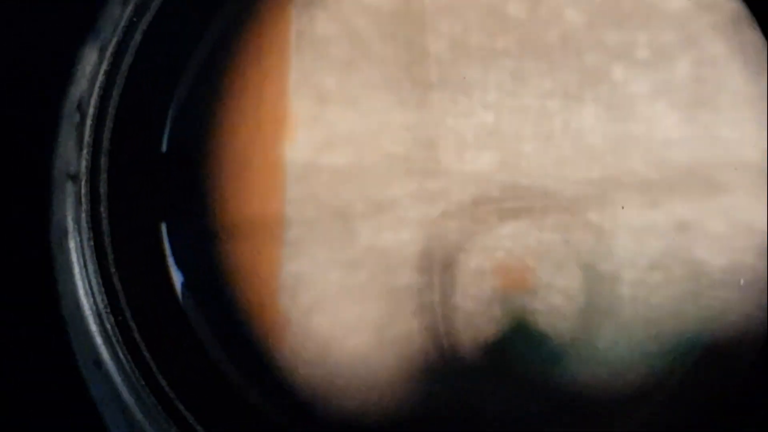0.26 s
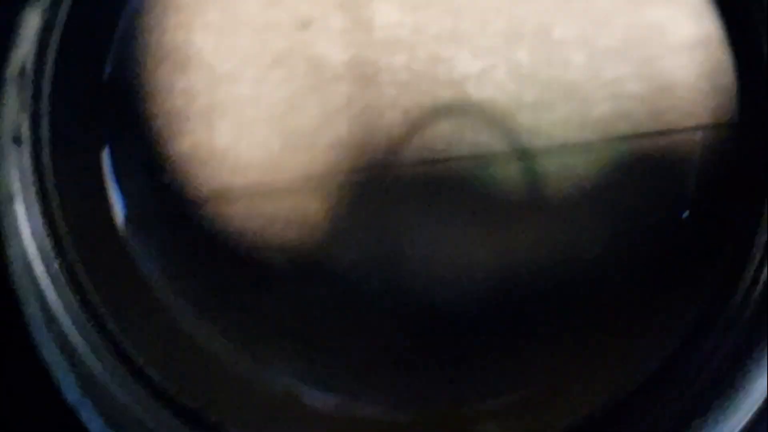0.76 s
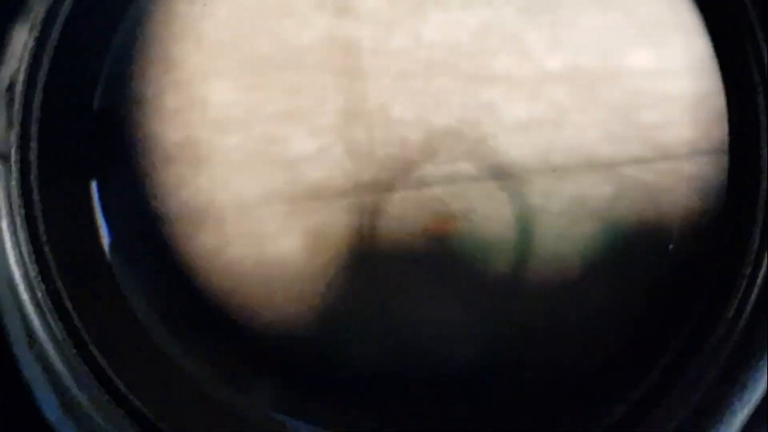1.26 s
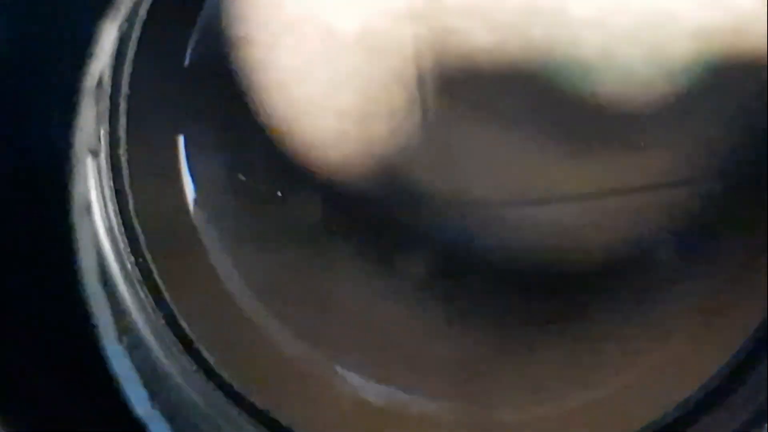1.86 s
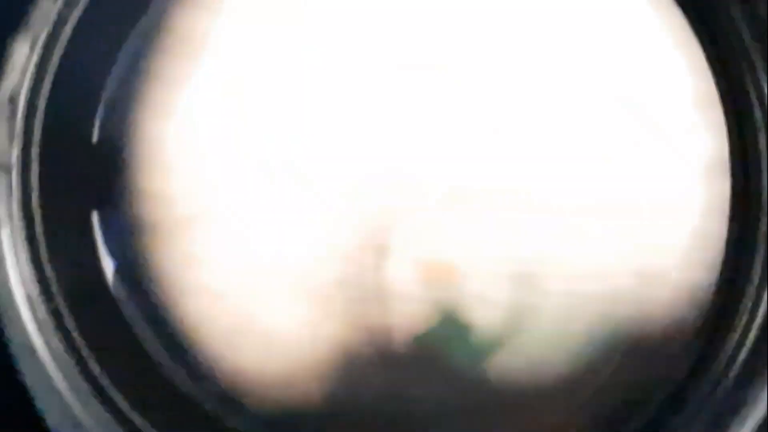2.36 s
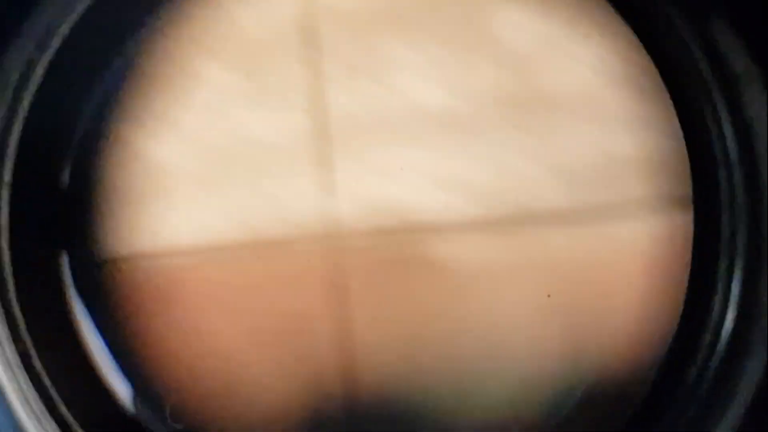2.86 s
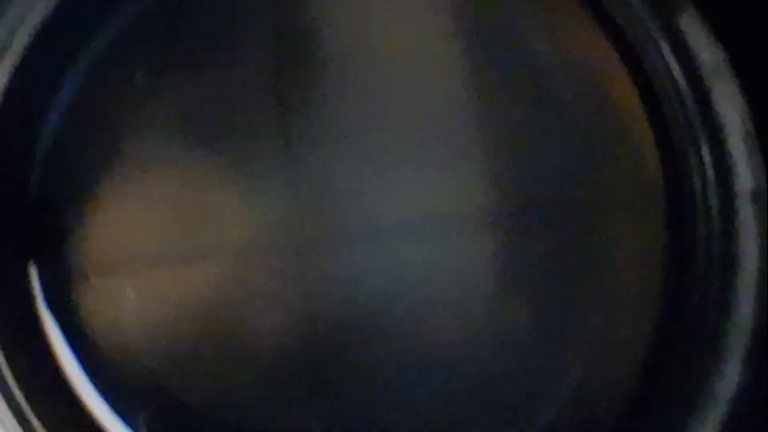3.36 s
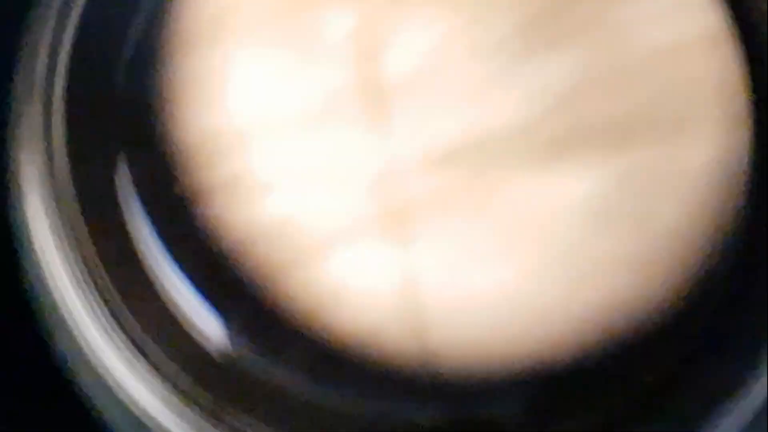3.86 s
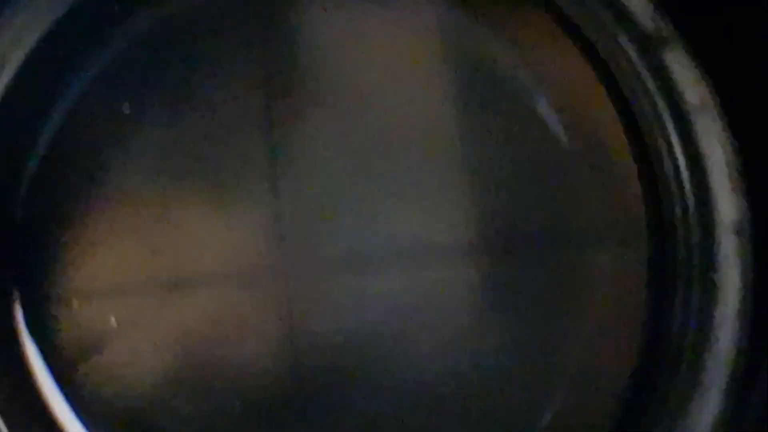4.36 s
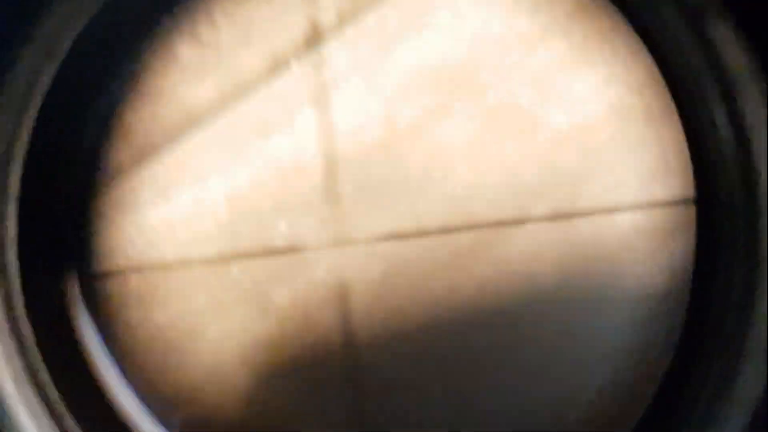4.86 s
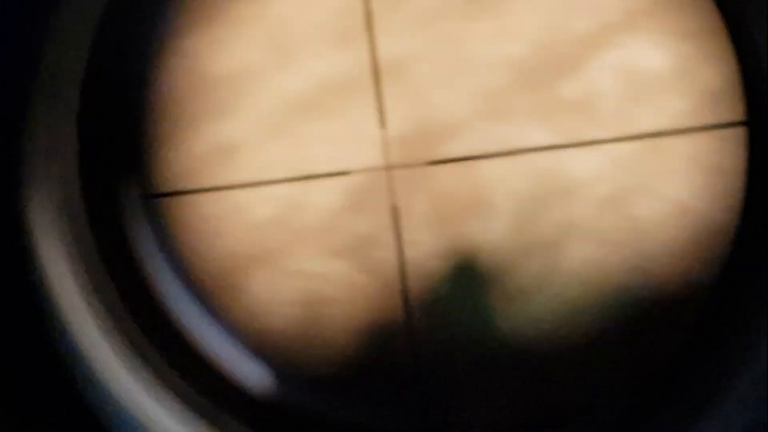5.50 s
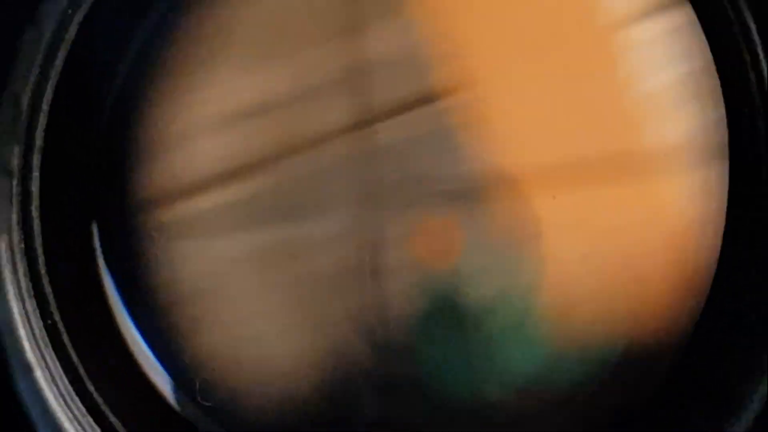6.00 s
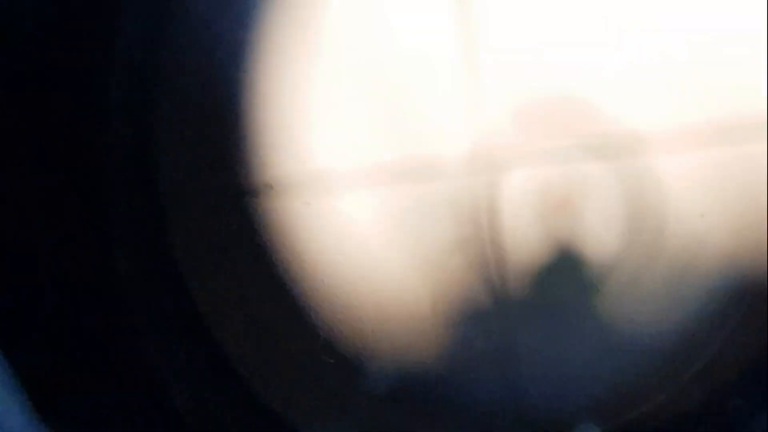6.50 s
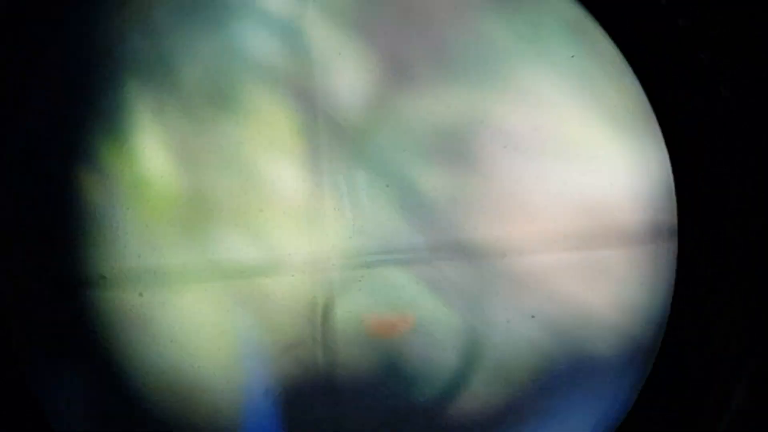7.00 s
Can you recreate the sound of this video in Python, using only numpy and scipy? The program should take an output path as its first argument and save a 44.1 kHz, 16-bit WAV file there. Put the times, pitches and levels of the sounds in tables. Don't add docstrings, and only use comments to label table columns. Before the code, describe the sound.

Very close on an air rifle under an outdoor shelter. Soft rumbles, cloth rustle and muffled wood bumps come first; then a loud lever clunk, a scraping, groaning cocking stroke, bright steel clicks, a latch snap and a return scrape. After a brief lull it is set down with a double clacking knock, a loose fitting rattles, and faint bird cheeps sit in quiet air hiss. The microphone is mounted on the rifle, picking up stock vibration strongly.

```python
import sys
import numpy as np
from scipy import signal
from scipy.fft import rfft, irfft
from scipy.io import wavfile
from scipy.ndimage import uniform_filter1d

SR = 44100
rng = np.random.default_rng(int(sys.argv[2]) if len(sys.argv) > 2 else 0)


def store_pcm(level_fs):
    pcm = np.round(np.clip(level_fs, -1, 1) * 32767).astype(np.int16)
    wavfile.write(sys.argv[1], SR, np.atleast_2d(pcm).T)


def undo_db(level):
    steps = np.asarray(level, float) / 20
    return 10 ** steps


N = 319536

# frequency in Hz, width in Hz, level in dB.
STOCK_MODES = [(123, 14, -11.5), (163.8, 9.3, 2), (198.2, 16.8, -5), (260, 35, -7), (355, 170, -18.5)]
# frequency in Hz, width in Hz, level in dB.
PORT_MODES = [(9360, 680, 7), (10350, 520, 12.5), (11630, 1500, 8), (13550, 890, -1.5), (15400, 440, -6)]


def rms_one(x):
    return x / np.sqrt(np.mean(x ** 2) + 1e-20)


def steady(x, span_s):
    power = uniform_filter1d(np.mean(x ** 2, axis=0), size=int(span_s * SR))
    return x / np.sqrt(power + 0.00091)


def in_time(rows):
    s, *columns = np.transpose(rows)
    return [np.interp(np.arange(N) / SR, s, c) for c in columns]


def moves(rows, rise_db_per_s, fall_db_per_s):
    t = np.arange(0, N + 64, 64) / SR
    s, held, db, above_db = np.transpose(rows)[:, :, None]
    shape = db - rise_db_per_s * np.maximum(s - t, 0) - fall_db_per_s * np.maximum(t - s - held, 0)
    return [np.interp(np.arange(N) / SR, t, v.max(axis=0)) for v in (shape, shape + above_db)]


def drift(rate):
    r = np.exp(-80 * np.pi * rate / SR)
    chance = rng.standard_normal(N // 40 + 2002)
    slow = signal.lfilter([1], [1, -2 * r, r * r], chance)[2000:]
    return np.interp(np.arange(N) / 40, np.arange(len(slow)), rms_one(slow))


def resonate(x, modes):
    out, power = 0, 0
    for k, (hz, width, db) in enumerate(modes):
        r = np.exp(-np.pi * width / SR)
        b = undo_db(db) * (1 - r * r) / 2 * np.array([1, 0, -1])
        a = [1, -2 * r * np.cos(2 * np.pi * hz / SR), r * r]
        out = out + (-1) ** k * signal.lfilter(b, a, x + 1e-18)
        power += undo_db(db) ** 2 * np.pi * width / SR
    return out / np.sqrt(power)


def band(x, low_hz, high_hz):
    sos = signal.butter(2, [low_hz, min(high_hz, .45 * SR)], "band", fs=SR, output="sos")
    return signal.sosfilt(sos, x + 1e-18 * (-1) ** np.arange(x.shape[-1]))


def friction(per_s, spread_db, alike, lead, flicker_db, flicker_rate):
    draw = rng.random((3, N)) * SR / per_s
    slip, sizes = draw < 1, np.zeros((3, N))
    rare = np.minimum(-np.log(draw[slip] + 1e-12), 4)
    signs = np.resize(rng.choice([-1, 1], 9973), rare.shape)
    sizes[slip] = undo_db(spread_db * rare) * signs
    shared, *own = sizes
    alike = np.clip(alike, 0, 1)
    common = np.array([np.roll(shared, -int(lead)), shared])
    slips = np.sqrt(alike) * common + np.sqrt(1 - alike) * np.array(own)
    return rms_one(slips * undo_db(flicker_db * drift(flicker_rate)))


def add(out, s, piece):
    i = round(s * SR)
    out[..., i:i + piece.shape[-1]] += piece[..., :N - i]


def grip():
    # frequency in Hz, width in Hz, level in dB.
    sway_modes = [(41.3, 17.4, -1), (66.6, 21.9, -1), (103.8, 22.3, -9.5)]
    # time in seconds, tremor in dB.
    hold = [(0.0, -65.5), (0.5, -67.5), (0.9, -50), (1.65, -57.5), (2.26, -59.5), (2.58, -75), (2.86, -86),
            (2.92, -49.5), (4.7, -58.5), (4.8, -63.5), (5.06, -92), (5.15, -50), (5.5, -48.5),
            (5.77, -63.5), (6.0, -49.5), (6.9, -53), (7.25, -49)]
    # start in seconds, held in seconds, sway in dB, shudder above sway in dB.
    shifts = [(0.28, 0.13, -53, -4), (0.59, 0.0051, -46.5, -6), (0.8, 0.37, -60.5, 8),
              (1.75, 0.0053, -45.5, -2.5), (2.37, 0.078, -46, -5.5), (2.905, 0.0083, -44.5, -2),
              (1.34, 0.1, -55, -1), (3.21, 0.014, -33, 3), (3.46, 0.13, -44.5, 9.5), (3.6, 0.15, -40.5, 7),
              (3.93, 0.039, -29, -10), (4.12, 0.165, -42.5, -3), (4.32, 0.14, -49, 7),
              (4.52, 0.089, -41.5, -3), (4.9, 0.028, -57.5, -6.5), (5.12, 0.11, -57.5, -0.5),
              (5.3, 0.12, -41, 3.5), (5.91, 0.084, -42, -13), (6.11, 0.083, -29, -20),
              (7.0, 0.026, -34.5, -17.5)]
    cap_db = -40.5, -25
    hold_db, = in_time(hold)
    levels = np.maximum(moves(shifts, 521, 191), [hold_db, hold_db - 10])
    sway_db, shudder_db = np.minimum(levels, np.array(cap_db)[:, None])
    sway = steady(resonate(friction(400., 1.3, 0.41, 48, 5.0, 7.4), sway_modes), 0.11)
    shudder = steady(resonate(friction(300., 4.7, 0.62, 46, 6.4, 12.7), STOCK_MODES), 0.06)
    shaking = undo_db(sway_db + 4.5) * sway + undo_db(shudder_db + 4.0) * shudder
    return signal.sosfilt(signal.butter(2, 420, fs=SR, output="sos"), shaking)


def thuds():
    # start in seconds, peak in dB, pitch in Hz, left-right in dB.
    heaves = [(0.259, -40, 57, -2.5), (0.595, -43, 62, -2), (0.848, -44, 71, -5), (1.757, -34, 72, 7),
              (2.905, -32.5, 55, -3), (2.96, -41, 52.7, 3), (3.048, -26.5, 51.6, 2), (3.204, -16.5, 69, -1),
              (3.916, -34, 70.6, 0), (4.132, -20.5, 45.4, -1), (4.2, -31.5, 48, 0),
              (4.892, -50, 61.5, -4.5), (5.113, -40.5, 57.4, 1), (5.2, -38.5, 58, -1),
              (5.31, -21.5, 64.4, -9.5), (5.898, -31.5, 75, 1), (6.105, -35.5, 70, 11.5),
              (6.162, -33, 85, -1), (6.997, -38, 64, 11)]
    # start in seconds, peak in dB, pitch in Hz, left-right in dB.
    bumps = [(0.586, -39.5, 179, 1), (0.834, -37.5, 175, 0), (1.039, -31.5, 192, 2),
             (1.735, -27.5, 119, 1.5), (2.349, -51, 144.7, -17), (2.389, -41.5, 236, 0),
             (2.408, -36, 268, -4), (2.426, -35.5, 167, -1), (3.928, -37, 155, 2), (0.851, -39, 303, 9),
             (3.362, -55.5, 377, 1), (4.79, -67, 242, -1), (2.881, -53, 200, 1), (3.221, -19, 144, -1.5),
             (3.227, -18.5, 164, -4.5), (3.223, -19.5, 270, 5), (4.1099, -19, 275, 3),
             (4.116, -19.5, 175, 0), (4.571, -32.5, 179, 0), (5.299, -26, 116, -9),
             (5.356, -24.5, 156, -7.5), (5.357, -25, 252, -1)]
    # start in seconds, peak in dB, pitch in Hz, left-right in dB.
    raps = [
        (1.1063, -29, 840, 8.5),
        (2.4042, -43, 710, 2),
        (3.2138, -22, 700, 2),
        (4.109, -25, 600, 4.5),
        (5.2994, -25.5, 520, -2),
        (5.348, -24.5, 700, 1),
    ]
    # start in seconds, peak in dB, pitch in Hz, left-right in dB.
    rings = [
        (3.1855, -27, 740, -.5),
        (4.0985, -35, 780, 1),
        (5.945, -53, 560, 0),
        (3.9005, -45, 730, 1),
        (3.877, -48, 830, -2),
        (3.9125, -49, 930, 0),
        (3.638, -44, 560, 3),
        (4.752, -66, 840, 0),
        (5.138, -68, 760, 0),
    ]
    # start in seconds, peak in dB, pitch
    # in Hz, left-right in dB.
    further_blows = [(4.842, -54, 65, 0), (4.98, -56.5, 65, 0), (4.655, -50, 110, -2), (2.46, -48, 56, 2),
                     (.7, -52, 126, 1), (.758, -48, 190, 0), (.808, -46, 200, 0), (5.945, -38, 58, 2),
                     (6.0, -44, 66, 2), (6.04, -45, 62, 2)]
    heave_cycles, bump_cycles, rap_cycles, ring_cycles = 1.38, 2.6, .9, 5.5
    kinds = ((heaves, heave_cycles), (bumps, bump_cycles), (raps, rap_cycles), (rings, ring_cycles),
             (further_blows, heave_cycles))
    blows = [(*row, cycles) for rows, cycles in kinds for row in rows]
    out, jolts = np.zeros((2, N)), np.zeros((2, N))
    chance = rng.standard_normal((len(blows), 2))
    shake = rng.standard_normal((len(blows), 2, 3000)) * undo_db(-60 * np.arange(3000) / SR / 0.075)
    for (s, db, hz, pan_db, cycles), (turn, skew), jolt in zip(blows, chance, shake):
        t = np.arange(int(6 * cycles / hz * SR)) / SR
        age = t * hz / (0.34 * cycles)
        port_phase = np.array([[0.67 + 0.32 * skew], [-.65 + 0.15 * turn]])
        spread = (hz / 110.0 if hz < 300 else 1) ** .33
        phase = 2 * np.pi * hz * t * (1 - 0.018 * age) + spread * port_phase
        gain = undo_db(db + 6.5 + np.array([[pan_db], [-pan_db]]) / 2)
        first_swing = -1 if cycles == rap_cycles else 1
        add(out, s, first_swing * gain * age * np.exp(1 - age) * np.sin(phase))
        add(jolts, s, gain / cycles * jolt)
    return out + undo_db(-17.0) * band(resonate(jolts, STOCK_MODES[2:]), 150, 480)


def strokes():
    # frequency in Hz, width in Hz, level in dB.
    fore_end_modes = [(480, 182, -11.5), (585, 98, -7), (760, 59, 0), (870, 94, -7.5)]
    # frequency in Hz, width in Hz, level in dB.
    tube_modes = [(1660, 270, -3.5), (2655, 340, -1), (3300, 320, -2.5), (3750, 150, -2.5),
                  (5400, 950, -10)]
    # time in seconds, rub on wood in dB, piston scrape in dB.
    stroke_levels = [
        [(0.0, -73, -74), (0.268, -66.5, -74), (0.426, -76, -74), (0.55, -105, -101)],
        [(0.0, -70, -100), (0.17, -74, -100), (0.3, -80, -100), (0.45, -80, -100)],
        [(3.33, -85, -70), (3.4, -62, -68), (3.47, -56.5, -53), (3.588, -62, -54.5), (3.66, -57.5, -55),
         (3.74, -62.5, -60), (3.87, -77, -69)],
        [(4.2, -76, -68), (4.4, -84.5, -66), (4.44, -62, -51), (4.52, -76, -64), (4.7, -103, -88)],
        [(2.5, -77, -95), (2.56, -84, -93), (2.68, -99, -100)],
        [(5.38, -79, -85), (5.5, -81, -92), (5.65, -99, -103)],
        [(3.35, -69, -100), (3.42, -60.5, -100), (3.5, -60, -100), (3.58, -54.5, -100), (3.71, -54.5, -100),
         (3.8, -68, -100)],
    ]
    pitches = [0.943, 0.847, 1.05, 1.063, 0.95, 1.02, 0.567]
    widths = [1.4, 1.7, 1.6, 0.77, 1.1, 0.8, 1.7]
    rub, scrape_gain, t = np.zeros((2, N)), np.zeros(N), np.arange(N) / SR
    slips = steady(friction(1500., 3.5, .3, 30, 1.5, 30.0), .03)
    for rows, pitch, width in zip(stroke_levels, pitches, widths):
        start, end = rows[0][0], rows[-1][0]
        moving = uniform_filter1d(1. * (t >= start) * (t < end), size=1500)
        rub_db, scrape_db = in_time(rows)
        span = slice(int(max(start - .05, 0) * SR), int((end + .1) * SR))
        rubbing = (moving * undo_db(rub_db + 12.0) * slips)[:, span]
        rub[:, span] += resonate(rubbing, np.array(fore_end_modes) * [pitch, width, 1])
        scrape_gain += moving * undo_db(scrape_db - 6.0)
    grains = friction(2000., 2.1, 0.054, 25, 2.1, 29.0)
    through_steel = resonate(grains, tube_modes)
    scrape = rms_one(resonate(through_steel, tube_modes))
    return band(rub, 220, 1300) + scrape_gain * scrape


def hums():
    # start in seconds, swell in seconds, peak in dB, pitch in Hz, left-right in dB.
    swells = [(3.393, 0.019, -27.5, 177, -3), (3.431, 0.026, -22, 169, 1), (3.5, 0.015, -35, 171, 0),
              (3.616, 0.043, -20.5, 165.7, -2), (3.665, 0.049, -17.5, 166.2, 2),
              (3.728, 0.021, -32, 162, -3), (3.76, .02, -36, 163, 0), (3.79, .09, -38, 166, 0),
              (4.04, .055, -43, 170, 4), (4.311, 0.025, -26, 178.4, -1), (4.4, 0.032, -24, 174.6, 1.5)]
    damp_s = 0.0063
    out, t = np.zeros((2, N)), np.arange(int(.15 * SR)) / SR
    for s, swell, db, hz, pan_db in swells:
        shape = np.minimum(t / swell, 1) ** 0.42 * np.exp(-np.maximum(t - swell, 0) / damp_s)
        gain = undo_db(db + 1.5 + np.array([[pan_db], [-pan_db]]) / 2)
        add(out, s, gain * shape * np.sin(2 * np.pi * hz * t + np.array([[.7], [-.65]])))
    return out


def clicks():
    # start in seconds, top peak in dB, body in dB, body pitch in Hz.
    snaps = [(1.1063, -44, -49, 2190), (3.2142, -36, -21, 2200), (3.2182, -26, -31, 1980),
             (3.6099, -19, -65, 3200), (4.0993, -32, -30.5, 2650), (4.1088, -43, -22, 2860),
             (4.1112, -20, -44.5, 3040), (4.1195, -26, -34, 2290), (5.307, -27.5, -30.5, 1650),
             (5.3115, -16, -32, 1450), (5.3245, -18, -41, 3146), (5.284, -38, -40, 3000),
             (5.319, -36, -46, 2500), (5.335, -38, -43, 5500), (5.3478, -32, -26, 2300),
             (5.2815, -34, -34.5, 2480), (3.8765, -22.5, -34.5, 6230)]
    # start in seconds, top peak in dB, body in dB, body pitch in Hz.
    ticks = [(3.184, -47, -36, 1450), (3.1862, -16, -34.5, 4400), (3.189, -21, -39, 4970),
             (3.443, -41.5, -70, 1520), (3.4737, -39, -57, 2840), (3.7516, -33, -47.5, 2710),
             (3.7715, -71, -52, 2550), (3.8761, -13.5, -41, 2850), (3.8799, -38, -37.5, 3500),
             (4.095, -26.5, -55, 2690), (4.4115, -26, -48, 3200), (6.943, -60, -66, 2000),
             (4.4186, -15, -53, 3060), (4.4236, -19, -42, 3220), (2.375, -56, -80, 3000),
             (4.327, -48, -70, 3000), (5.892, -74, -69, 3900), (5.2707, -41, -59, 3330),
             (5.304, -26, -50, 3000), (5.316, -39, -51, 3000), (6.0897, -50, -68, 3900)]
    # start in seconds, top peak in dB, body in dB, body pitch in Hz.
    rattles = [
        (2.4041, -50, -57.5, 1850),
        (3.1975, -27, -42, 3300),
        (3.191, -45, -46, 2400),
        (3.222, -50, -52, 4500),
        (3.586, -41, -57.5, 3150),
        (4.5016, -46, -74, 3150),
        (5.281, -27.5, -50, 3160),
        (5.282, -42, -49, 1800),
        (5.9961, -63, -56, 1470),
    ]
    # rows, decay time in s, width of the body tone as a share of its pitch
    kinds = (snaps, 0.0047, 0.5), (ticks, 0.018, 0.24), (rattles, 0.043, 0.24)
    top, crack, body = np.zeros(N), np.zeros(N), np.zeros((2, N))
    t = np.arange(int(.2 * SR)) / SR
    contacts = steady(friction(14000., 3.5, .6, 16, .3, 30.0), .002)
    for s, top_db, body_db, hz, t60, width in [(*row, *kind) for rows, *kind in kinds for row in rows]:
        decay = undo_db(-60 * t / t60) + undo_db(-20.0 - 60 * t / (6.4 * t60))
        fall = decay * (1 - np.exp(-t / 0.00055)) ** 1.4
        add(top, s, undo_db(top_db - 5.5) * fall)
        sharp = undo_db(-60 * t / 0.0017) * (1 - np.exp(-t / 0.0007)) * 0.039 / t60
        add(crack, s, np.sqrt(undo_db(top_db + body_db + 4.0)) * sharp)
        here = contacts[:, round(s * SR):][:, :len(t)]
        body_modes = [(hz, width * hz, 0), (4500, 6000, -17), (6100, 500, -14)]
        add(body, s, undo_db(body_db + 7.5) * resonate(fall * here, body_modes))
    cracks = band(crack * contacts, 1800, 6600) + band(crack * contacts, 8400, 16000)
    return resonate(top * contacts, PORT_MODES) + cracks + body


def knocks():
    # start in seconds, peak in dB, pitch in Hz.
    butt = [(0.377, -47.5, 550), (0.826, -49, 500), (0.848, -40.5, 418), (1.04, -51, 467),
            (1.105, -33.5, 447), (1.181, -48.5, 390), (1.209, -46.5, 394), (2.41, -51, 480),
            (2.402, -39, 377), (3.214, -30, 437), (3.562, -36.5, 430), (3.587, -35, 390),
            (3.637, -34.5, 535), (3.941, -46.5, 420), (4.006, -62.5, 450), (4.181, -51, 489),
            (5.348, -38, 414)]
    # start in seconds, peak in dB, pitch in Hz.
    fore = [(0.387, -47, 734), (0.847, -43.5, 740), (1.04, -50, 850), (2.402, -41.5, 950),
            (3.186, -27, 630), (3.396, -46.5, 630), (3.705, -49.5, 830), (3.878, -47, 900),
            (3.903, -46, 900), (4.098, -35, 850), (4.109, -35.5, 870), (4.426, -42.5, 700),
            (4.57, -37, 677), (4.752, -65, 838), (5.139, -67, 760), (5.282, -39, 760), (5.3, -33, 700),
            (5.312, -39, 910), (5.324, -35.5, 720), (2.417, -53, 960)]
    butt_t60_s, fore_t60_s = 0.042, 0.045
    out, t = np.zeros((2, N)), np.arange(int(.12 * SR)) / SR
    taps = [(*row, butt_t60_s) for row in butt] + [(*row, fore_t60_s) for row in fore]
    contacts = rng.standard_normal((len(taps), 2, len(t)))
    for (s, db, hz, t60), (shared, own) in zip(taps, contacts):
        fall = undo_db(-60 * t / t60) * (1 - np.exp(-t / 0.0011))
        at_ports = [np.roll(shared, -12) + 0.56 * own, shared - 0.25 * own]
        tap = resonate(fall * at_ports, [(hz, 1.56 * hz, 0), (1.6 * hz, 0.25 * hz, -8)])
        tap = band(tap, 0.41 * hz, 1.125 * hz)
        add(out, s, undo_db(db + 3.0) * tap / np.abs(tap.mean(axis=0)).max())
    return out


def slide():
    # frequency in Hz, width in Hz, level in dB.
    cloth_modes = [(600, 53, 2.5), (1420, 510, -5.5), (2200, 2500, -8.5), (4160, 1540, -2.5),
                   (6170, 2800, -9)]
    # start in seconds, held in seconds, rustle in dB, brush above rustle in dB.
    sleeves = [(0.2, 0.2, -69, -11), (0.5, 1.84, -88, 1.5), (2.5, 0.13, -70.5, -12.5),
               (2.9, 0.11, -70, -13), (3.1, 0.1, -72.5, -10.5), (3.36, .3, -65.5, -8),
               (3.9, 0.37, -72.5, -4.5), (4.27, 0.077, -67.5, -7.5), (4.42, 0.16, -66, -8),
               (4.7, 0.032, -72, -12.5), (5.43, 0.043, -67, -7.5), (6.03, 0.12, -70, -5.5),
               (6.35, 0.11, -82.5, -5.5), (7.05, 0.13, -71, -8)]
    rest_db = -85
    rustle_db, brush_db = np.maximum(moves(sleeves, 55, 91.5), [[rest_db], [rest_db - 7]])
    fibres = friction(8000., 3.5, 0.1, 17, 1.2, 21.0)
    brush = resonate(undo_db(brush_db + 11.0) * fibres, cloth_modes)
    fine_fibres = friction(16000.0, 3.2, 0.18, 16, 0.94, 13.0)
    rustle = resonate(undo_db(rustle_db + 5.0) * fine_fibres, np.array(PORT_MODES) * [1, 1.3, 1])
    return brush + signal.sosfilt(signal.butter(4, 8300, "high", fs=SR, output="sos"), rustle)


def scuffs():
    # start in seconds, level in dB, low in Hz, high in Hz, t60 in seconds.
    noise_bursts = [(.845, -58, 1500, 2620, 0.054), (.562, -72, 2000, 2250, 0.38), (.565, -72, 1600, 1800, .2),
                    (2.955, -64, 9500, 15000, .25), (.571, -65, 816, 990, 0.29), (.808, -63, 400, 2200, 0.37),
                    (1.038, -61, 750, 2530, 0.15), (1.107, -55.5, 503, 1380, 0.12), (2.402, -50, 810, 2450, 0.09),
                    (2.872, -61, 8880, 13800, 0.38), (6.166, -62, 870, 1010, 0.069),
                    (6.922, -60, 9300, 12600, 0.31), (6.93, -56.5, 432, 2200, 0.37),
                    (7.09, -74.5, 1830, 2100, 0.88), (2.342, -62, 347, 1070, 0.17), (4.49, -59, 2700, 3600, 0.048),
                    (4.5, -48.5, 2870, 3600, 0.058), (6.93, -64, 3500, 8010, 0.27), (7.1, -71, 546, 900, 0.78),
                    (5.279, -45, 400, 1300, .1), (5.301, -43, 600, 1500, 0.1), (5.312, -48, 2740, 3730, 0.16),
                    (5.314, -51, 4000, 7500, 0.21), (2.388, -54, 450, 1600, 0.1), (2.409, -47, 800, 1250, 0.055),
                    (2.43, -67, 500, 2500, 0.25), (3.905, -53, 750, 1300, .13), (4.005, -48, 300, 555, 0.049),
                    (4.028, -59, 300, 517, .08), (4.138, -51, 300, 1100, 0.095), (4.178, -58, 280, 700, .07),
                    (3.193, -40.5, 700, 1600, .08), (5.944, -54.5, 480, 670, 0.14), (1.022, -62, 600, 900, 0.07),
                    (1.243, -62, 400, 1200, .04)]
    # start in seconds, level in dB, t60 in seconds.
    fitting_tap = (5.944, -56, 1.1)
    # frequency in Hz, width in Hz, level in dB.
    fitting_modes = [(500, 123, 0), (1500, 270, -1.5), (1970, 270, 0), (2660, 220, -3), (3420, 190, -5),
                     (3900, 440, -4), (5380, 520, -6), (6460, 460, -10.5), (10600, 3700, -11.5)]
    out, t = np.zeros((2, N)), np.arange(int(.4 * SR)) / SR
    rough = steady(friction(5000., 2.5, .3, 18, 1.5, 40.0), .012)
    for k, (s, db, low_hz, high_hz, t60) in enumerate(noise_bursts):
        rise = 0.061 * t60
        swell = np.minimum(t / rise, 1) ** 2 * undo_db(-60 * np.maximum(t - rise, 0) / t60)
        grains = rough[:, k * len(t) % (N - len(t)):][:, :len(t)]
        add(out, s, undo_db(db) * swell * rms_one(band(grains, low_hz, high_hz)))
    s, db, t60 = fitting_tap
    grains = rough[:, round(s * SR):][:, :len(t)]
    ringing = rms_one(resonate(resonate(grains, fitting_modes), fitting_modes))
    second_tap = 1 + 1.4 * np.exp(-((t - .054) / 0.006) ** 2)
    end_fade = np.clip((.3 - t) / .05, 0, 1)
    for low_hz, high_hz, lasts in (300, 2300, 0.15), (2300, 15000, 0.22):
        rattle = undo_db(-60 * t / t60) * np.clip((lasts - t) / 0.036, .1, 1) * second_tap
        rattle = rattle + 3.2 * undo_db(-60 * t / 0.081)
        add(out, s, undo_db(db) * rattle * end_fade * band(ringing, low_hz, high_hz))
    return out


def shelter(x):
    t60_s, level_db = 0.26, -16
    t = np.arange(int(.5 * SR)) / SR
    tail = rng.standard_normal((2, len(t))) * undo_db(-60 * t / t60_s) * (t > .004)
    tail = rms_one(tail) / np.sqrt(len(t))
    return undo_db(level_db) * signal.fftconvolve(x, tail, axes=1)[:, :N]


def bird():
    # start in seconds, first pitch in Hz, last pitch in Hz, length in seconds.
    cheeps = [
        (6.294, 8600, 8450, 0.055),
        (6.44, 9200, 8900, 0.019),
        (6.46, 8750, 8700, 0.031),
        (6.506, 8750, 8860, .015),
        (6.56, 8950, 9100, .015),
        (4.765, 13100, 11900, .04),
    ]
    out = np.zeros(N)
    for s, start_hz, end_hz, length in cheeps:
        hz = np.linspace(start_hz, end_hz, int(length * SR))
        add(out, s, np.hanning(len(hz)) * np.sin(2 * np.pi * np.cumsum(hz) / SR))
    return undo_db(-78.5) * out


def air():
    # frequency in Hz, spectral level in dB per Hz.
    spectrum = [(35, -24.5), (60, -7), (146, -6.5), (469, -4), (767, -4.5), (924, -4), (1090, -6),
                (2190, -6.5), (2900, -12.5), (7230, -24), (11000, -6.5), (16000, -3.5)]
    hz = np.maximum(np.fft.rfftfreq(N, 1 / SR), 20)
    knots_hz, knots_db = np.transpose(spectrum)
    colour = undo_db(np.interp(np.log(hz), np.log(knots_hz), knots_db))
    colour /= np.sqrt(np.mean((colour * (hz > 300)) ** 2))
    return undo_db(-72 + 3.5) * irfft(rfft(rng.standard_normal((2, N))) * colour, N)


def scene():
    hard = clicks() + knocks()
    handling = grip() + strokes() + slide() + scuffs() + thuds() + hums()
    return handling + hard + shelter(hard) + bird() + air()


def roll_off(x):
    return signal.sosfilt(signal.butter(12, 16520, fs=SR, output="sos"), x)


def record(dry):
    cut = signal.sosfilt(signal.butter(2, 31, "high", fs=SR, output="sos"), dry)
    cut = signal.sosfilt(signal.cheby2(12, 45, 1.007 * 16150, fs=SR, output="sos"), cut)
    return roll_off(cut)


dry = scene()
out = record(dry)
store_pcm(out)
```